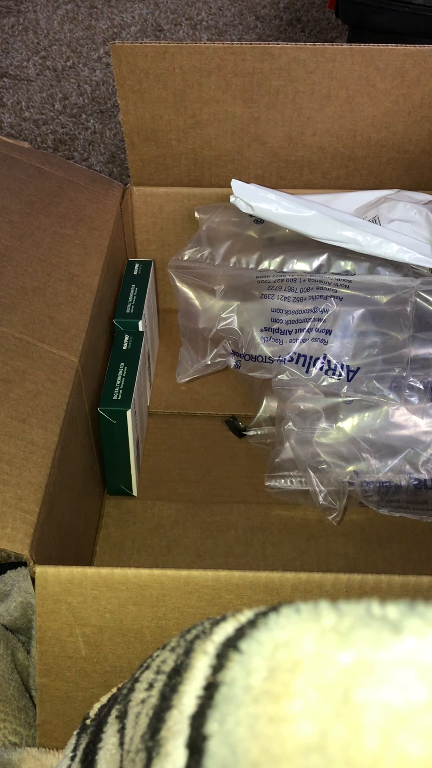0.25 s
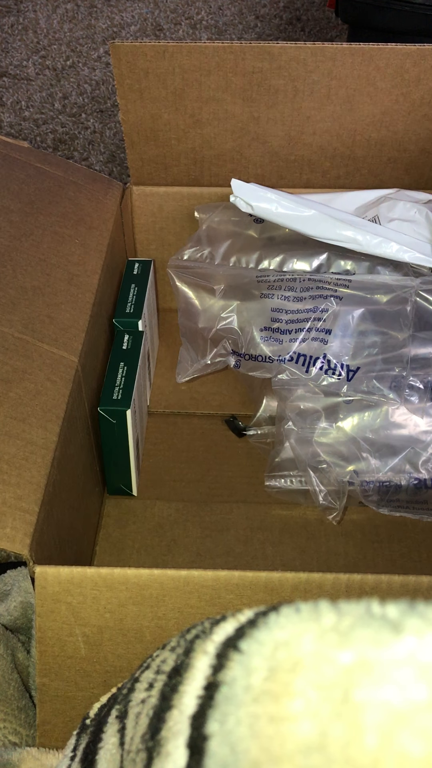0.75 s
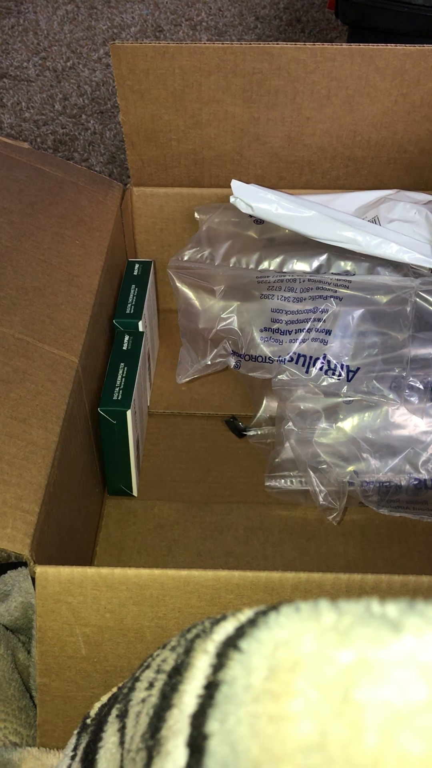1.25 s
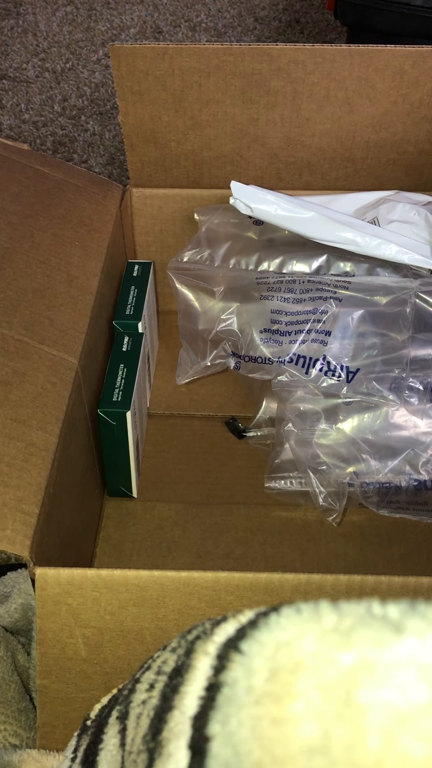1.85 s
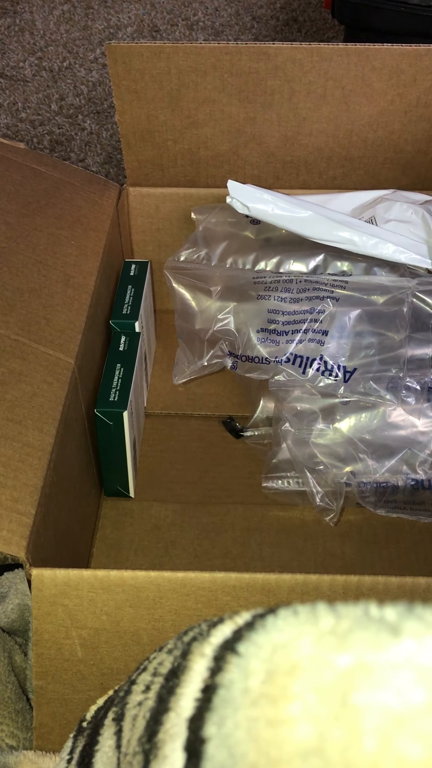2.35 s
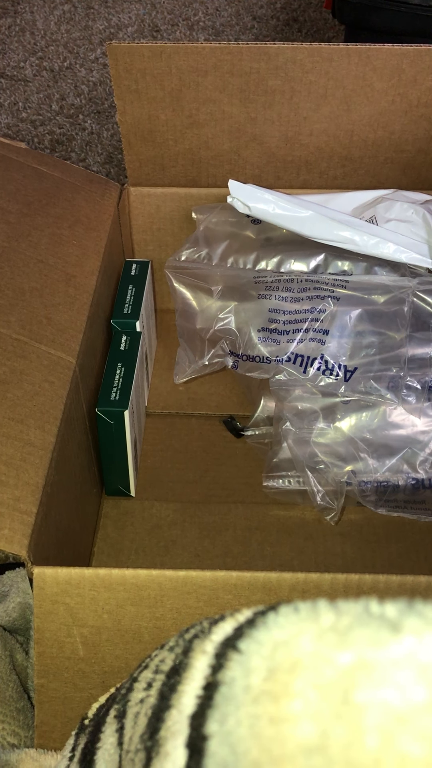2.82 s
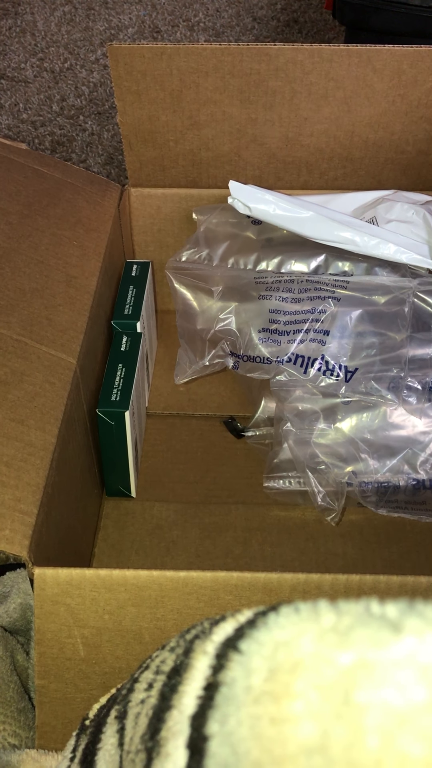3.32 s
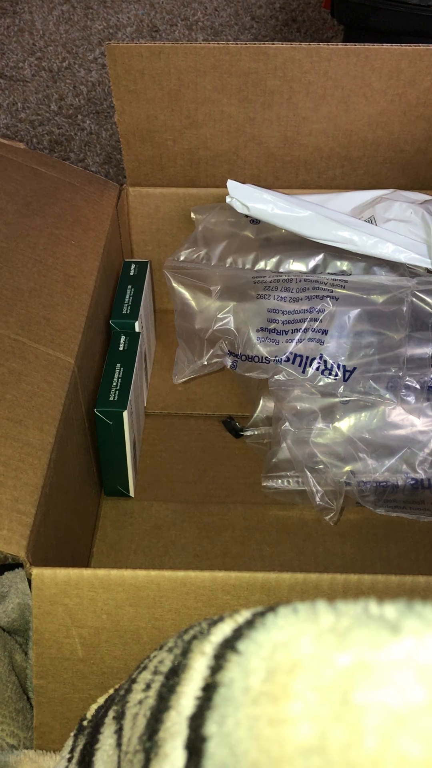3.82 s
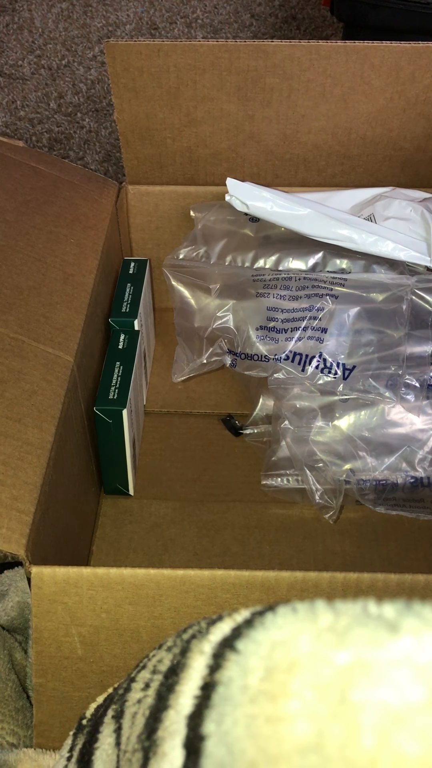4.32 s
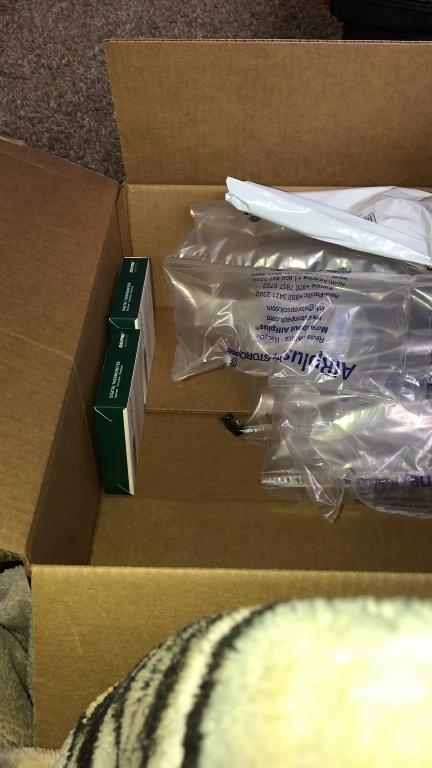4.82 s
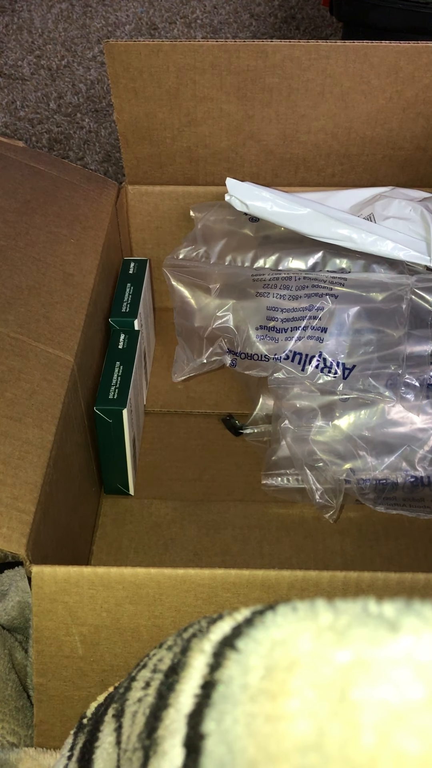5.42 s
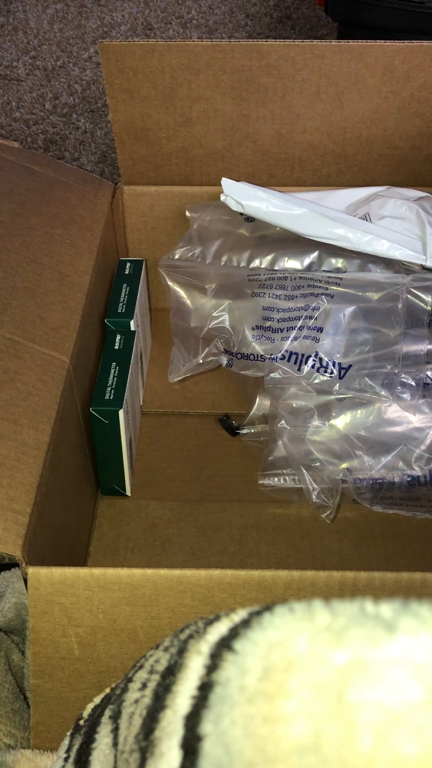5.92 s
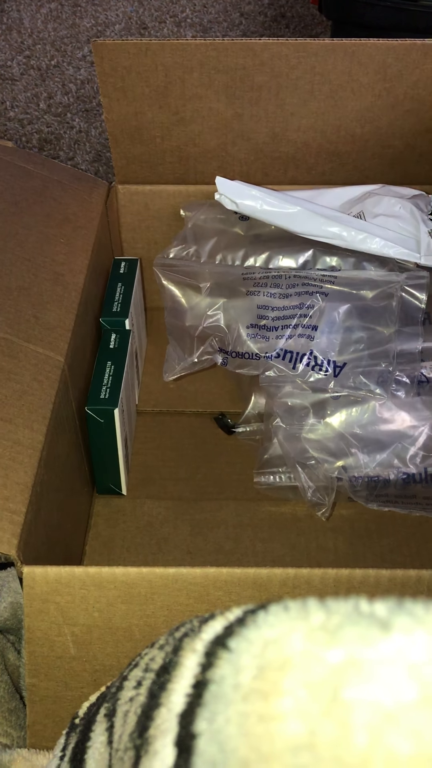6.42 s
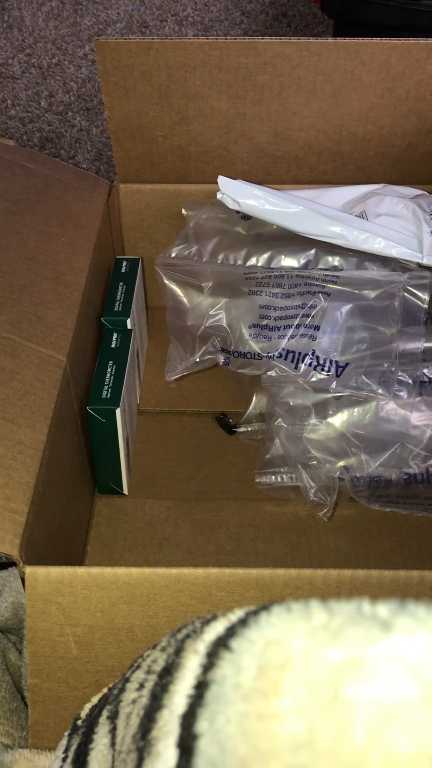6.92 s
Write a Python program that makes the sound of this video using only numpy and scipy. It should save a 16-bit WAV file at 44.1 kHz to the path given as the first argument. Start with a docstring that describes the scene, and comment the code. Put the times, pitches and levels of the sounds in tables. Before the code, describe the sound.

Steady low mains hum in a small room while fingers faintly crinkle film, then packing tape rips off in short, loud, stuttering tears.

```python
"""In a small carpeted room, packing tape is picked at and ripped off a package close by in a few short pulls.
The tape peels by stick-slip: single slips run together into a rip, and each cracks the film and twangs the
freed strip. Taut film snaps as bursts of bright crackle. Fingers crinkle and scuff the wrapping as showers
of tiny impulses, and bump the cardboard, which rings as a sum of damped modes.
Behind them lie a steady mains hum, a faint whine, soft room noise and rumble."""
import sys
import numpy as np
from scipy import signal
from scipy.fft import rfft, irfft, next_fast_len
from scipy.io import wavfile
from scipy.ndimage import map_coordinates

SR = 44100
rng = np.random.default_rng(int(sys.argv[2]) if len(sys.argv) > 2 else 0)


def wav_record(signal):
    """Record a signal, one row per channel, as 16-bit PCM in the file named by sys.argv[1]."""
    frames = np.transpose(np.atleast_2d(signal))
    bounded = np.clip(frames, -1, 1)
    # unit amplitude maps onto the largest positive 16-bit level
    quanta = np.round(bounded * 32767).astype(np.int16)
    wavfile.write(sys.argv[1], SR, quanta)


N = 315751
TIME = np.arange(N) / SR
BRIEF = TIME[:SR // 8]  # time axis of one short event

# sound radiation of the tape film: f/Hz, relative spectrum level/dB
FILM_COLOUR = [(60, -43), (150, -20), (250, -7), (500, -9.5), (1000, -7.5), (1400, -2), (2200, -3),
               (2750, -4.5), (3400, -0.5), (4500, -1.5), (6200, -2.5), (7500, -7.5), (10200, -11.5),
               (13000, -10), (16000, -13.5)]
# sound radiation of rustling film: f/Hz, relative spectrum level/dB
RUSTLE_COLOUR = [(150, -16), (400, -1.5), (1500, -3), (2500, -1), (3600, 3.5), (6000, -2.5), (10000, -7.5),
                 (13000, -10), (16000, -7.5)]


def amp(db):
    """The decibel is logarithmic: 20 dB is a tenfold gain in amplitude."""
    return 10 ** (np.asarray(db) / 20)


def unit(x):
    """Scale to rms 1, the measure of mean power."""
    return x / np.sqrt(np.mean(x ** 2) + 1e-20)


def crest(x):
    """Scale to peak 1, the measure of a transient."""
    return x / (np.abs(x).max() + 1e-12)


def along(points, hz):
    """Interpolate (f/Hz, value) points on a logarithmic frequency axis."""
    f, v = np.transpose(points)
    return np.interp(np.log(hz + 1), np.log(f + 1), v)


def add(track, s, x):
    """Superpose x on the track from time s."""
    part = track[max(round(s * SR), 0):][:len(x)]
    part += x[:len(part)]


def coloured(x, points, tilt_db=0):
    """Minimum-phase filter through (f/Hz, level/dB) points, with a tilt in dB per octave."""
    m = 2 * next_fast_len(len(x) // 2 + 2048)
    hz = np.fft.rfftfreq(m, 1 / SR)
    level_db = along(points, hz) + tilt_db * np.log2((hz + 200) / 4000)
    cepstrum = irfft(np.log(amp(level_db) + 1e-6))
    # folding the cepstrum onto positive times makes the response causal
    cepstrum[1:m // 2] *= 2
    cepstrum[m // 2 + 1:] = 0
    return irfft(rfft(x, m) * np.exp(rfft(cepstrum)), m)[:len(x)]


def ring(hz, t60, attack):
    """A struck mode is a sine under exponential decay."""
    return np.sin(2 * np.pi * hz * BRIEF) * amp(-60 * BRIEF / t60) * (1 - np.exp(-BRIEF / attack))


def burst(t60):
    """A broadband release is white noise under exponential decay."""
    return rng.standard_normal(len(BRIEF)) * amp(-60 * BRIEF / t60)


def grains(size, rate, spread_db):
    """Many micro-events form a random impulse train of uneven strength, here at rms 1."""
    strength = amp(spread_db * np.clip(rng.standard_normal(size), -2, 2))
    fires = rng.random(size) < rate / SR
    return unit(fires * rng.choice([-1, 1], size) * strength)


def rips():
    """Running stick-slip: slips come ever faster and twang a strip whose pitch moves with its free length."""
    # running rips: t/s, length/s, time to full pull/s, crackle level/dB, its fade after full pull/dB,
    # twang level/dB, its fade over the rip/dB, strip start f/Hz, strip end f/Hz, brightness/(dB per octave)
    rip_rows = [(4.483, .07, .002, -31, 12, -39, 10, 1670, 750, -0.5),
                (5.456, 0.076, 0.0023, -42.5, 22, -42.5, 12, 745, 665, -3),
                (5.686, .06, 0.023, -24, 2, -25, 21, 1530, 1410, -0.7),
                (6.002, .073, 0.025, -19, 12.5, -22, 5.5, 1260, 787, -0.1),
                (6.377, .038, .017, -25, -2, -31.5, 0, 1080, 1410, .8)]
    first_rate_hz, speedup_hz = 300, 169.8  # slips a second at the start, and the gain by the end
    pull_rise_db = 4  # growth of the crackle up to full pull
    surge_t60_s, steady_peel = .0035, 0.29  # crackle surge after a slip; constant part added to the surges
    out = np.zeros(N)
    for (start, length, full_s, crackle_db, fade_db,
         twang_db, twang_fade_db, start_hz, end_hz, bright_db) in rip_rows:
        t = BRIEF[BRIEF < length]
        strip, release = np.zeros((2, len(BRIEF)))
        s = 0
        while s < length:
            progress = s / length
            strength = amp(-twang_fade_db * progress + rng.normal(0, 1.3))
            scatter = np.exp(rng.normal(0, 0.086))  # pitch differs from slip to slip
            hz = start_hz * (end_hz / start_hz) ** progress * scatter
            add(strip, s, strength * ring(hz, t60=0.0057, attack=0.00067))
            add(release, s, amp(-60 * BRIEF / surge_t60_s))
            uneven = rng.uniform(.55, 1.45)
            s += uneven / (first_rate_hz + speedup_hz * progress)
        # the crackle surges after each slip and follows the pull
        pull = amp(np.interp(t, [0, full_s, length], [-pull_rise_db, 0, -fade_db]))
        glue = crackle(pull * (release[:len(t)] + steady_peel), bright_db)
        mix = amp(twang_db) * unit(strip) + amp(crackle_db) * unit(glue)
        add(out, start, np.sqrt(len(t) / len(BRIEF)) * mix)  # levels hold over the rip's own length
    return out


def crackle(envelope, bright_db):
    """Brittle fracture: glue threads snap in a dense impulse shower radiated by the film."""
    threads = grains(len(envelope), rate=7000, spread_db=2.5) * envelope
    return coloured(np.pad(threads, (0, len(BRIEF) - len(envelope))), FILM_COLOUR, bright_db)


def slips():
    """Single stick-slip: under rising pull the glue gives in jumps, each a crack and a short twang."""
    # single slips of the tape: t/s, level/dB, strip f/Hz
    slip_rows = [(4.513, -17, 1460), (4.517, -23, 1240), (5.62, -27, 2163), (5.629, -18, 1770),
                 (5.654, -16, 2040), (5.67, -13.5, 1913), (5.677, -5, 1840), (5.683, -11.5, 1400),
                 (5.748, -7.5, 1110), (5.988, -4.5, 1250), (5.994, -4.5, 1680), (5.998, -8, 1200),
                 (6.319, -21, 1130), (6.331, -19, 910), (6.338, -12, 1015), (6.35, -10, 1039),
                 (6.364, -11, 1026), (6.373, -12.5, 1000)]
    crack_db, crack_per_db = -2, 0.57  # crack over twang at level 0 dB; weaker slips are more crack
    out = np.zeros(N)
    for s, db, hz in slip_rows:
        twang = crest(ring(hz * np.exp(rng.normal(0, 0.032)), t60=0.0076, attack=0.00031))
        crack = crest(coloured(burst(t60=0.017), FILM_COLOUR, tilt_db=-2.0))
        mix = twang + amp(crack_db - crack_per_db * db) * crack
        add(out, s + 0.00102, amp(db - 3.5) * crest(mix))
    return out


def snaps():
    """Sudden release of tension: taut film gives all at once in milliseconds of zinging crackle."""
    # bright snaps of taut film: t/s, length/s, level/dB, brightness/(dB per octave)
    snap_rows = [(4.461, 0.012, -41, 8), (4.468, 0.0075, -25.5, -2.5), (4.477, .0065, -16, -1),
                 (5.465, 0.0044, -29, -2.5)]
    # extra ring of taut film: f/Hz, relative level/dB
    zing_colour = [(2200, 2), (5600, 6.5), (7500, 10), (12000, 2.5)]
    out = np.zeros(N)
    for s, length, db, bright_db in snap_rows:
        size = np.count_nonzero(BRIEF < length)
        tear = coloured(crackle(np.ones(size), bright_db), zing_colour)
        add(out, s, amp(db) * np.sqrt(size / len(BRIEF)) * unit(tear))
    return out


def ticks():
    """Snap-through buckling: a crease flips with a sharp crack amid a shower of smaller creases."""
    # clearest crinkles of the film under the fingers: t/s, level/dB, ring f/Hz
    tick_rows = [(0.154, -32.5, 5200), (0.4846, -37, 3350), (0.5365, -33, 3150), (0.855, -37, 3400),
                 (1.4587, -42, 3600), (1.6489, -29.5, 3500), (1.8852, -31, 3430), (1.92, -27.5, 3540),
                 (2.032, -34.5, 5170), (2.0624, -30, 3100), (2.07, -30.5, 3340), (2.164, -30.5, 3660),
                 (2.261, -36.5, 5700), (2.3782, -18.5, 6040), (2.394, -25, 7400), (2.4571, -14.5, 4720),
                 (2.56, -31, 4230), (2.8659, -33.5, 4200), (2.9558, -20, 5200), (2.9852, -31.5, 3230),
                 (3.5547, -28, 3440), (3.6441, -31, 3370), (3.7917, -32.5, 3220), (3.818, -28.5, 3320),
                 (4.845, -29, 1980), (4.8601, -25, 2400), (5.5363, -25.5, 4200), (6.573, -24, 3800),
                 (6.6114, -35.5, 5290), (7.003, -32.5, 3150)]
    # spectrum of a crease's crack: multiple of its ring f, relative spectrum level/dB
    crack_shape = [(.05, -11.5), (.2, -8), (.55, -7), (1, 1), (1.5, -5), (2.3, -11.5), (5, -15)]
    shower_t60_s, shower_lead_s = 0.24, .007  # smaller creases die away; they begin just before the flip
    shower_db, shower_growth = -49.5, 0.56  # their level beside a 0 dB flip; dB per dB of the flip
    out = np.zeros(N)
    for s, db, hz in [*tick_rows, *faint(per_s=3.1, db=-42.5, hz=3750)]:
        crack = crest(coloured(burst(t60=0.0075), np.multiply(crack_shape, [hz, 1])))
        ping = crest(ring(hz, t60=.0025, attack=.0001))
        add(out, s + 0.0011, amp(db - 1.5) * crest(crack + .5 * ping))
        decay = amp(-60 * BRIEF / shower_t60_s) * (1 - np.exp(-BRIEF / 0.002))
        shower = grains(len(BRIEF), rate=600, spread_db=4) * decay
        shower_gain = amp(shower_db + shower_growth * db)
        add(out, s - shower_lead_s, shower_gain * unit(coloured(shower, RUSTLE_COLOUR)))
    return out


def scuffs():
    """Sliding friction: a dragging fingertip makes a swell of grains, dull on cardboard, bright on tape."""
    # fingers scuffing over cardboard and tape: t/s, length/s, level/dB, centre f/Hz
    scuff_rows = [(0.025, 0.0078, -53.5, 915), (0.284, 0.081, -59.5, 3800), (1.247, 0.022, -62, 890),
                  (1.377, 0.04, -52, 536), (1.422, 0.053, -55.5, 725), (1.634, 0.025, -57.5, 3420),
                  (1.859, 0.036, -60.5, 1500), (2.055, 0.024, -52, 1830), (2.332, 0.014, -51.5, 1510),
                  (3.397, 0.041, -58.5, 1100), (3.645, 0.034, -55.5, 1590), (4.85, 0.03, -51.5, 1530),
                  (5.962, 0.032, -44, 2590)]
    # spectrum of a scuff: multiple of the centre f, relative spectrum level/dB
    friction_shape = [(.1, -20), (.45, -6), (1, 0), (1.6, -6.5), (3.5, -16), (12, -33)]
    out = np.zeros(N)
    for s, length, db, centre_hz in scuff_rows:
        size = round(length * SR)
        drag = grains(size, rate=1100, spread_db=4.5) * np.hanning(size) ** 0.2
        add(out, s, amp(db) * unit(coloured(drag, np.multiply(friction_shape, [centre_hz, 1]))))
    return out


def rustle():
    """Crackling noise: the handled film creaks in random clumps of fine impulses."""
    # course of the handling, before its swing is widened: t/s, level/dB
    handling_curve = [(0.0, -71.5), (0.7, -78), (1.37, -81), (1.93, -73), (2.04, -75.5), (2.45, -68),
                      (2.98, -69), (3.12, -76.5), (3.35, -74), (3.52, -64.5), (3.7, -69.5), (3.87, -70),
                      (4.11, -71.5), (4.44, -69.5), (4.95, -68), (5.468, -65.5), (5.6, -60), (6.55, -66),
                      (6.824, -68.5), (7.16, -66.5)]
    pivot_db, pivot_level_db, swing = -69, -64.5, 2.07  # curve value; level there; dB per dB around it
    handling_db = np.interp(TIME, *np.transpose(handling_curve)) - pivot_db
    level = amp(pivot_level_db + swing * handling_db)
    # a random strength every 1000 samples, joined by straight lines
    clumps = map_coordinates(rng.standard_normal(N // 1000 + 4), [np.arange(N) / 1000], order=1)
    creases = grains(N, rate=1000, spread_db=-1.5) * amp(3.0 * clumps)
    return level * unit(coloured(creases, RUSTLE_COLOUR))


def knocks():
    """Modal excitation: a bump rings the package's modes, most strongly near the pitch its contact favours."""
    # clearest bumps on the cardboard: t/s, level/dB, favoured f/Hz
    knock_rows = [(0.026, -36.5, 287), (1.393, -37.5, 404), (2.339, -37.5, 277), (2.38, -40, 297),
                  (2.456, -37.5, 302), (2.589, -40, 248), (4.483, -12.5, 297), (4.491, -15.5, 333),
                  (4.518, -29, 340), (4.861, -27.5, 265), (5.461, -20, 322), (5.631, -27.5, 298),
                  (5.964, -27.5, 296), (6.055, -18.5, 272), (6.068, -15.5, 246)]
    # modes of the package: f/Hz, relative level/dB, t60/s
    box_modes = [(207.6, -10, 0.11), (245, 4, 0.045), (293, -5, 0.074), (338.4, 1, 0.077),
                 (410, -14, 0.083), (558, -3.5, 0.045), (722, -20.5, 0.19), (900, -13, 0.11),
                 (1430, -8, 0.029)]
    out = np.zeros(N)
    for s, db, favoured_hz in [*knock_rows, *faint(per_s=1.3, db=-41.5, hz=252)]:
        body = np.zeros(len(BRIEF))
        for hz, mode_db, t60 in box_modes:
            octaves_off = min(abs(np.log2(hz / favoured_hz)), .5)
            weight = amp(mode_db + rng.normal(0, 3.1) - 7.8 * octaves_off)
            body += weight * rng.choice([-1, 1]) * ring(hz, t60, attack=0.0015)
        add(out, s, amp(db) * crest(body))
    return out


def faint(per_s, db, hz):
    """Random arrivals: light contacts at irregular moments, as rows of t/s, level/dB, f/Hz."""
    spread_db, spread_octaves = 4, 0.21  # standard deviations
    gaps = 2 * rng.random(100) / per_s
    times = np.cumsum(gaps)
    levels = db + spread_db * rng.standard_normal(100)
    pitches = hz * 2 ** (spread_octaves * rng.standard_normal(100))
    rows = np.column_stack([times, levels, pitches])
    return list(rows[times < N / SR])


def room(x, near_db, tail_db):
    """Reverberation: direct sound, quick echoes from box flaps and floor, and a frequency-dependent decay."""
    # reverberation time of the room: f/Hz, t60/s
    room_t60 = [(150, 0.065), (400, 0.23), (620, 0.44), (820, 0.41), (1100, 0.32), (4000, 0.35),
                (9000, 0.32), (16000, 0.18)]
    hz, t, z = signal.stft(rng.standard_normal(SR), SR, nperseg=256)
    decay = amp(-60 * t / along(room_t60, hz)[:, None])
    tail = signal.istft(z * decay, SR, nperseg=256)[1]
    tail *= 1 - np.exp(-TIME[:len(tail)] / 0.0078)  # the tail builds up gradually
    near = grains(len(BRIEF), rate=2200, spread_db=-5.5) * amp(-60 * BRIEF / 0.024)
    response = amp(tail_db) * tail / np.linalg.norm(tail)
    add(response, .002, amp(near_db) * near / np.linalg.norm(near))
    return x + signal.fftconvolve(x, response)[:N]


def background():
    """Stationary sound: steady tones of hum and whine over filtered noise for air and rumble."""
    # mains hum and a faint whine: f/Hz, rms level/dB
    hum_tones = [(120.03, -41.5), (1402, -75.5), (1782, -80)]
    # soft room noise: f/Hz, relative spectrum level/dB
    air_colour = [(80, -17.5), (170, -3), (280, 4), (400, -4), (520, -7.5), (800, -12.5), (1300, -14),
                  (1900, -15), (2500, -25.5), (3400, -16), (5000, -29), (7000, -30), (10000, -37),
                  (16000, -36.5)]
    # low rumble: f/Hz, relative spectrum level/dB
    rumble_colour = [(20, -16), (40, -6.5), (60, 0.5), (80, -3.5), (110, -1.5), (170, -1.5), (260, -20),
                     (500, -55)]
    hum = np.zeros(N)
    for hz, db in hum_tones:
        hum += np.sqrt(2) * amp(db) * np.sin(2 * np.pi * (hz * TIME + rng.random()))
    air = unit(coloured(rng.standard_normal(N), air_colour))
    rumble = unit(coloured(rng.standard_normal(N), rumble_colour))
    return hum + amp(-59.0) * air + amp(-59.0) * rumble


def scene():
    """Superposition: tape, fingers and package, each with its own reverberation, in the humming room."""
    tape = room(rips() + snaps() + slips(), near_db=-9, tail_db=-9.5)
    fingers = room(ticks() + scuffs(), near_db=-15, tail_db=-11)
    package = room(amp(-2.5) * knocks(), near_db=-21, tail_db=-6.5)
    return (tape + fingers + package + rustle() + background())[None]


def record(dry):
    """Transducer limits: a small microphone loses deep bass, saturates on peaks and is band-limited."""
    ceiling, top_hz = .62, 15900  # saturation amplitude; upper band limit
    thin = signal.sosfilt(signal.butter(3, 48, "highpass", fs=SR, output="sos"), dry)
    rounded = thin / (1 + np.abs(thin / ceiling) ** 4) ** (1 / 4)
    m = next_fast_len(N + SR // 2)
    passband = np.fft.rfftfreq(m, 1 / SR) < top_hz
    return irfft(rfft(rounded, m) * passband, m)[..., :N]


dry = scene()
out = record(dry)
wav_record(out)
```